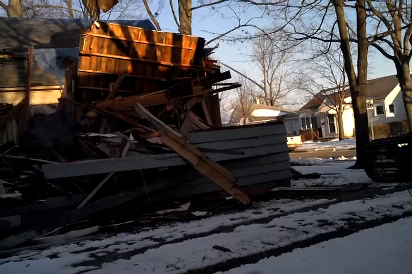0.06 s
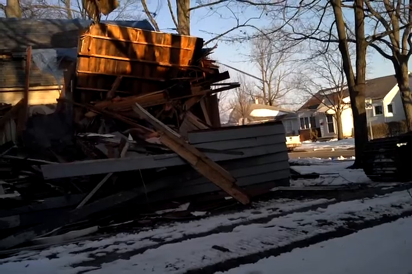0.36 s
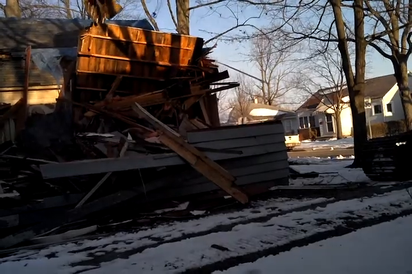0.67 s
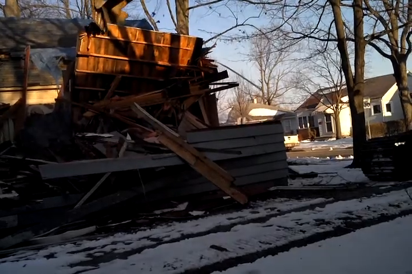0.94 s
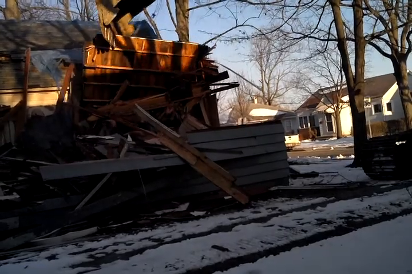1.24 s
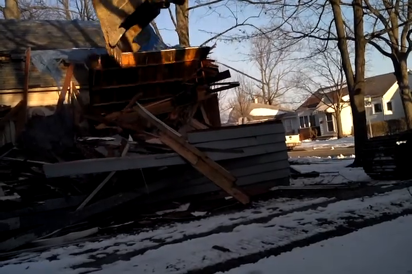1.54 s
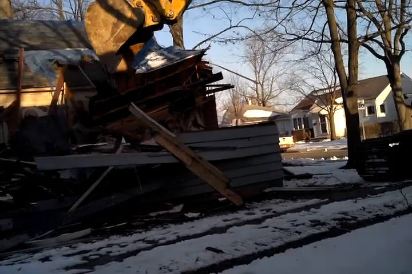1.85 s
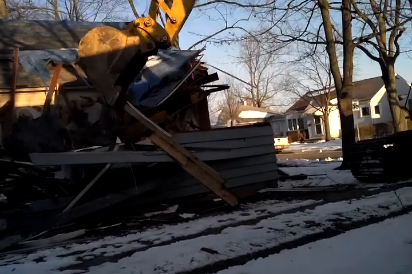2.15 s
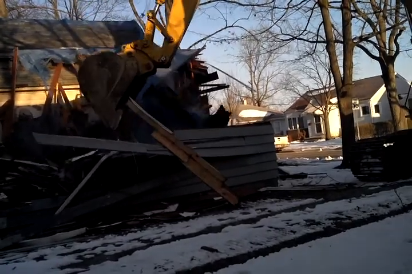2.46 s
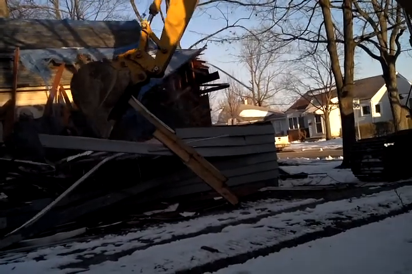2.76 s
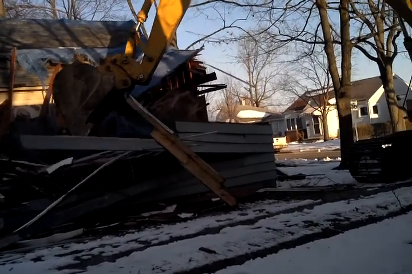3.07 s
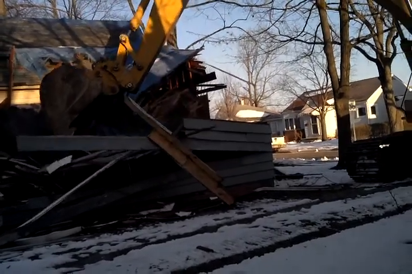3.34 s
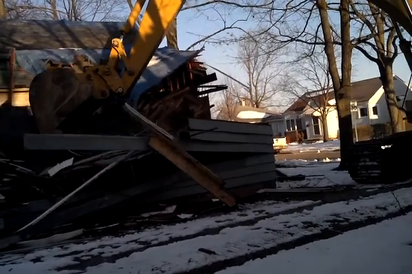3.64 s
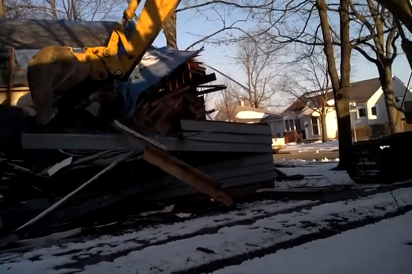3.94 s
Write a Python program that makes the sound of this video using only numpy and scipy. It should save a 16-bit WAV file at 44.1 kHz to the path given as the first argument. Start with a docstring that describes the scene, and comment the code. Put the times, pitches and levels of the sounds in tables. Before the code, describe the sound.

A wooden wall splinters under an excavator bucket, with continuous crunching, sharp cracks and hollow knocks that thin out near the end. The diesel engine labours briefly, then runs lighter. Heard across a yard, toward the right, with short echoes.

```python
"""A wooden wall splinters under the bucket of a diesel excavator, heard from across a yard.
Boards of the half-demolished house give way without pause: countless fibres snap and set the wood
ringing, with louder runs of tearing, single cracks, hollow knocks and two squeaks under the load.
Behind it the engine labours, then runs on more lightly. The small stereo microphone has the work to
its right, catches short echoes off the houses and widens its image by cross-feeding its capsules."""
import sys
import numpy as np
from scipy import signal
from scipy.fft import rfft, irfft, next_fast_len
from scipy.io import wavfile

SR = 44100
rng = np.random.default_rng(int(sys.argv[2]) if len(sys.argv) > 2 else 0)


def file_out(sig):
    """Save sig as 16-bit WAV at sys.argv[1]."""
    # one column per channel
    cols = np.atleast_2d(sig).T
    # limit, then scale
    lim = np.clip(cols, -1, 1)
    pcm = np.round(lim * 32767).astype(np.int16)
    wavfile.write(sys.argv[1], SR, pcm)


N = 176400
T = np.arange(N) / SR
FIBRES_PER_S = 5000

# steady splintering under the bucket: (time [s], level [dB], level of the finest splinters [dB])
CRUSH_LEVELS = [(0, -19.5, -32.5), (.12, -32.5, -41), (.33, -29.5, -40.5), (.6, -27.5, -37.5),
                (.69, -30, -36), (.8, -20, -32.5), (.92, -30, -39), (.97, -23.5, -30), (1.05, -23.5, -34),
                (1.11, -21, -41), (1.18, -22.5, -29.5), (1.28, -21.5, -34.5), (1.56, -24, -35),
                (1.63, -27.5, -39.5), (1.9, -27, -39), (2.05, -24, -39.5), (2.25, -24, -38.5),
                (2.38, -28.5, -41), (2.49, -22.5, -63), (2.58, -27.5, -43), (2.97, -28, -46),
                (3.02, -19, -40), (3.17, -24, -44), (3.32, -32, -46.5), (3.75, -39, -53.5), (4, -37, -49)]
# spectrum of breaking wood: (frequency [Hz], relative level [dB])
WOOD_SPECTRUM = [(50, -35), (130, -23.5), (280, -4.5), (450, 0.5), (700, 1.5), (1050, 0), (1400, -0.5),
                 (2000, 1), (3000, -7.5), (4500, -12.5), (7000, -17), (10000, -27.5), (15000, -48.5)]


def from_db(db):
    """Decibels to gain."""
    return 10 ** (np.asarray(db) / 20)


def unit_rms(x):
    """Scale each row to unit rms."""
    return x / np.sqrt(np.mean(x ** 2, axis=-1, keepdims=True) + 1e-20)


def in_time(rows):
    """The columns of a curve at every sample."""
    times, *columns = np.transpose(rows)
    return [np.interp(T, times, column) for column in columns]


def at_hz(spectrum, hz):
    """Read a spectrum in dB on a log-frequency axis."""
    points_hz, db = np.transpose(spectrum)
    return np.interp(np.log(hz + 1), np.log(points_hz), db)


def colour(x, spectrum, tilt_db=0, tilt_from_hz=1300, tilt_to_hz=13800):
    """Causal (minimum-phase) filter with the given spectrum, its treble tilted in dB per octave."""
    n = 2 * next_fast_len(x.shape[-1] // 2 + 2048)
    hz = np.fft.rfftfreq(n, 1 / SR)
    octaves = np.log2(np.clip(hz, tilt_from_hz, tilt_to_hz) / tilt_from_hz)
    cepstrum = irfft(np.log(from_db(at_hz(spectrum, hz) + tilt_db * octaves)))
    cepstrum[1:n // 2] *= 2
    cepstrum[n // 2 + 1:] = 0
    return irfft(rfft(x, n) * np.exp(rfft(cepstrum)))[..., :x.shape[-1]]


def drift(per_s):
    """Random wander of unit rms that changes per_s times a second."""
    return unit_rms(np.interp(T * per_s, np.arange(4096), rng.standard_normal(4096)))


def swell(t, rise_s, fall_s):
    """Bell-shaped rise to 1 at t = 0, then exponential fall."""
    return np.exp(-(np.minimum(t, 0) / max(rise_s, 1e-4)) ** 2 - np.maximum(t, 0) / fall_s)


def yard_echoes(x, level_db=-9, t60_s=0.19, cut_hz=8000):
    """The wreck and the neighbouring houses throw back a thin, dull tail of echoes."""
    t = T[:SR]
    reflections = rng.standard_normal((2, SR)) * (rng.random((2, SR)) < .03)
    tail = reflections * np.exp(-np.log(1000) * t / t60_s) * (t > .006)
    tail = from_db(level_db) * unit_rms(tail) / np.sqrt(SR)
    dull = signal.sosfilt(signal.butter(1, cut_hz, fs=SR, output="sos"), x)
    return signal.fftconvolve(dull, tail, axes=-1)[:, :N]


def engine(firings_per_turn=3, throb_depth=0.098, waver_db=2.0):
    """The diesel: crankshaft tones over noise that throbs with the firing, more rumble under load."""
    # crankshaft speed: (time [s], speed [turns/s])
    speed_curve = [(0, 24.5), (.47, 24.3), (.62, 22.9), (1.2, 25), (2.1, 23.2), (3.2, 21.5), (3.58, 21.1),
                   (4, 25.4)]
    # how hard the engine labours: (time [s], load [0-1])
    load_curve = [(0, 1), (.47, 1), (.53, 0.06), (4, 0.22)]
    # engine tones: (multiple of the speed, level running freely [dB], level labouring [dB])
    orders = [(4, -46, -38), (5, -51.5, -38), (6, -49.5, -41), (7, -42, -29), (8, -50.5, -34.5),
              (14, -48, -37)]
    # engine and fan noise: (frequency [Hz], density [dB per Hz])
    machine_spectrum = [(50, -82), (90, -78.5), (130, -62), (200, -57), (330, -56.5), (480, -60.5),
                        (670, -55), (810, -64.5), (1000, -54), (1400, -71.5), (2000, -69), (3000, -73.5),
                        (4500, -78), (7000, -89.5), (10000, -104), (15000, -108)]
    # exhaust noise at full load: (frequency [Hz], density [dB per Hz])
    exhaust_spectrum = [(30, -92), (60, -80), (100, -52), (200, -52), (320, -51), (520, -61.5),
                        (660, -53.5), (1050, -57), (1400, -64), (3000, -103)]
    (speed,), (load,) = in_time(speed_curve), in_time(load_curve)
    crank_angle = 2 * np.pi * np.cumsum(speed) / SR
    tones = 0
    for order, free_db, labouring_db in orders:
        level_db = free_db + (labouring_db - free_db) * load + waver_db * drift(11)
        phase = order * crank_angle + rng.uniform(0, 2 * np.pi) + 0.47 * drift(14)
        tones += np.sqrt(2) * from_db(level_db) * np.sin(phase)
    white = rng.standard_normal((2, 2, N)) * np.sqrt(SR / 2)
    noise = colour(white[0], machine_spectrum) + load * colour(white[1], exhaust_spectrum)
    throb = 1 + throb_depth * np.sin(firings_per_turn * crank_angle)
    return noise * throb + tones * np.array([[1], [0]])  # the tones arrive by the direct path only


def squeaks(pitch_waver=.02):
    """Stick-slip, perhaps of a nail or the bucket on wood: short, rough tones with harmonics."""
    # (peak time [s], pitch [Hz], glide [octaves/s], rise [s], fall [s], levels of harmonics 1-4 [dB])
    slips = [(0.496, 1784, 0, 0.0042, 0.023, -18.5, -18, -22, -28),
             (3.508, 1084, -22, 0.0039, 0.0062, -12, -30, -21.5, -26)]
    out = np.zeros((2, N))
    for s, hz, glide, rise_s, fall_s, *levels_db in slips:
        pitch = hz * 2 ** (glide * np.clip(T - s, -2 * rise_s, fall_s))
        phase = 2 * np.pi * np.cumsum(pitch * (1 + pitch_waver * drift(700))) / SR
        tone = sum(from_db(db + 2 * drift(400)) * np.exp(1j * k * phase)
                   for k, db in enumerate(levels_db, 1))
        tone = np.sqrt(2) * tone * swell(T - s, rise_s, fall_s)
        out += [tone.real, tone.imag]
    return out


def clatter(per_s=45, lowest_hz=640, octaves=2, decay_cycles=5):
    """Loose boards knock at random, as hard as the bucket is crushing: a list of strikes for knocks."""
    crush_db, _ = in_time(CRUSH_LEVELS)
    strikes = []
    for when, place, weakness in rng.random((int(per_s * N / SR), 3)):
        hz = lowest_hz * 2 ** (octaves * place)
        level_db = crush_db[int(when * N)] + 2 - 10 * weakness
        strikes.append((when * N / SR, hz, level_db, decay_cycles / hz))
    return strikes


def knocks(loose_strikes):
    """Struck boards, large ones and loose ones, ring hollow in a few quickly dying modes."""
    # knocks of larger boards: (time [s], pitch [Hz], level [dB], decay [s])
    large_strikes = [(.508, 1048, -16.5, 0.02), (.866, 648, -25.5, 0.01), (1.012, 489, -16, .006),
                     (1.088, 1125, -15, 0.011), (1.572, 1066, -11, 0.0055), (1.72, 683, -23, 0.011),
                     (2.12, 698, -17.5, 0.02), (2.421, 682.4, -18, 0.0059), (2.995, 646, -14.5, 0.0078),
                     (3.178, 937, -20, 0.017)]
    # modes of a board: (multiple of its pitch, relative level [dB])
    modes = [(0.999, 5.5), (1.329, -1.5), (1.62, -6)]
    out = np.zeros((2, N))
    for s, hz, level_db, decay_s in large_strikes + loose_strikes:
        start = int(s * SR)
        t = T[:min(SR // 3, N - start)]
        for ratio, mode_db in modes:
            paths = np.array([[1], [rng.uniform(-0.75, 1)]])  # direct, scattered
            ring = np.sin(2 * np.pi * hz * ratio * t) * np.exp(-t / decay_s)
            out[:, start:start + len(t)] += from_db(level_db + mode_db) * ring * paths
    return out


def snaps(decay_s=.0022):
    """A brittle piece parts at once: a very short spit of noise, an octave wide."""
    # brittle pieces parting: (time [s], level [dB], band centre [Hz])
    pieces = [(1.149, -19, 9500), (1.164, -19.5, 8500), (1.190, -23, 10500), (3.4972, -11, 3200),
              (3.5095, -15, 3300)]
    out, t = np.zeros((2, N)), T[:SR // 20]
    for s, level_db, hz in pieces:
        band = signal.butter(1, [hz / np.sqrt(2), hz * np.sqrt(2)], "band", fs=SR, output="sos")
        spit = unit_rms(signal.sosfilt(band, rng.standard_normal((2, len(t)))))
        start = int(s * SR)
        out[:, start:start + len(t)] += from_db(level_db) * spit * np.exp(-t / decay_s)
    return out


def clicks(per_s, size, spread_db=1):
    """Fibres snap at random: two rows (direct, scattered) of clicks of uneven strength."""
    strength = from_db(spread_db * np.minimum(rng.exponential(1, (2, size)), 4))
    polarity = rng.choice([-1, 1], (2, size))
    return strength * polarity * (rng.random((2, size)) < per_s / SR)


def boards(x, count, low_hz=372, high_hz=4330, t60_cycles=45, ring_gain=0.57):
    """Deal clicks to boards that each ring briefly at a pitch of their own; the dry snap stays on top."""
    dealt, rings = rng.integers(0, count, x.shape), 0
    for k, place in enumerate((np.arange(count) + rng.random(count)) / count):
        hz = low_hz * (high_hz / low_hz) ** place
        radius = np.exp(-np.log(1000) * hz / (t60_cycles * SR))
        poles = [1, -2 * radius * np.cos(2 * np.pi * hz / SR), radius ** 2]
        ring = signal.lfilter([1 - radius, 0, radius - 1], poles, x * (dealt == k) + 1e-18)
        rings += ring * (-1) ** k
    return x + ring_gain * np.sqrt(count) * rings


def crushing(splinters_per_s=1500, flutter_rms_db=1.58):
    """Countless splinters, coarse and fine, give way while the bucket presses down."""
    # spectrum of the finest splinters: (frequency [Hz], relative level [dB])
    fine_spectrum = [(1000, -23), (3500, 6.5), (8500, 2), (11000, -9.5), (15000, -18)]
    coarse_db, fine_db = in_time(CRUSH_LEVELS)
    flutter_db = flutter_rms_db * drift(110)
    coarse = unit_rms(colour(boards(clicks(splinters_per_s, N), count=24), WOOD_SPECTRUM))
    fine = unit_rms(colour(clicks(FIBRES_PER_S, N), fine_spectrum))
    return from_db(coarse_db + flutter_db) * coarse + from_db(fine_db + flutter_db) * fine


def fracture(s, level_db, rise_s, fall_s, tilt_db, hold_s=0):
    """One board breaks: a burst of snapping fibres that sets a few resonances ringing."""
    size = SR // 3
    t = (np.arange(size) - size // 2) / SR
    envelope = swell(t - np.clip(t, 0, hold_s), rise_s, fall_s)
    fibres = clicks(FIBRES_PER_S, size) * envelope
    burst = unit_rms(colour(boards(fibres, count=5), WOOD_SPECTRUM, tilt_db))
    out = np.zeros((2, N + 2 * SR))  # a second to spare at each end
    start = SR + int(s * SR) - size // 2
    out[:, start:start + size] = burst * np.sqrt(np.mean(envelope ** 2)) * from_db(level_db)
    return out[:, SR:SR + N]


def breaking():
    """The wall's boards break: tears build up; cracks start at once and hold for an instant."""
    # runs of tearing: (peak time [s], level [dB], rise [s], fall [s], treble tilt [dB/octave])
    tears = [(0.204, -28.5, 0.0041, 0.013, 7), (.29, -31, 0.004, 0.012, 10),
             (0.522, -17, 0.011, 0.011, 1.5), (0.797, -23.5, 0.01, 0.021, 10.5),
             (.998, -16.5, 0.047, 0.019, -4), (1.092, -14.5, 0.0085, 0.022, 3),
             (1.29, -17.5, 0.028, 0.0063, 0), (1.524, -18.5, 0.0067, 0.028, 1),
             (2.125, -18, 0.017, 0.047, 1), (2.171, -16, 0.017, 0.0069, -5),
             (2.824, -18.5, 0.023, 0.029, -3), (2.937, -20.5, 0.01, 0.0086, -1.5),
             (3.183, -20, 0.0085, 0.018, -2), (3.847, -12, 0.015, 0.022, 0.1),
             (3.91, -24.5, 0.039, 0.042, -0.5), (3.952, -25.5, 0.02, 0.016, 2)]
    # single cracks: (time [s], level [dB], decay [s], treble tilt [dB/octave])
    cracks = [(.431, -17, 0.0055, -13), (.484, -14, 0.0085, 3), (.546, -15, 0.0019, -4),
              (.565, -14, 0.0037, -4), (.594, -16.5, 0.014, -3.5), (0.634, -17, 0.0048, -2),
              (.79, -13.5, 0.0049, 2), (.809, -13, 0.0026, -9), (.867, -16.5, 0.0054, 1),
              (1.011, -9, 0.0031, 0), (1.057, -11, 0.0056, 0.5), (1.067, -15, 0.0031, -4),
              (1.241, -12, 0.0064, -3.5), (1.328, -12, 0.0022, -5.5), (1.437, -12.5, 0.0036, -2),
              (1.572, -10.5, 0.01, -5.5), (1.750, -19, .015, -2), (2.866, -17, 0.0068, -2),
              (2.908, -23, 0.0091, 2), (2.997, -22.5, 0.006, 1), (3.5, -16.5, 0.014, -0.5),
              (3.816, -16.5, 0.017, 1), (3.852, -12, 0.0018, 0.5)]
    tearing = sum(fracture(*tear) for tear in tears)
    cracking = sum(fracture(s, db, 0, decay, tilt, hold_s=0.0025) for s, db, decay, tilt in cracks)
    return tearing + cracking


def scene(lean_right=0.59):
    """Direct and scattered sound cross the yard to two capsules; the right one gets more."""
    # stereo width, as gain on the side signal: (frequency [Hz], gain [dB])
    width = [(100, -0.5), (230, -7), (500, -10), (900, -5.5), (2000, 2.5), (5000, 1), (14000, -1)]
    wood = crushing() + breaking() + snaps() + knocks(clatter()) + squeaks()
    direct, scattered = engine() + wood + yard_echoes(wood)
    side = np.sqrt(1 - lean_right ** 2) * scattered - lean_right * direct
    side = irfft(rfft(side) * from_db(at_hz(width, np.fft.rfftfreq(N, 1 / SR))), N)
    return np.array([direct + side, direct - side])


def record(dry, crossfeed_delay_s=.000382, crossfeed_from_hz=586, low_cut_hz=75, top_cut_hz=15800):
    """Small stereo microphone: each channel subtracts a delayed copy of the other above the bass."""
    # microphone response: (frequency [Hz], gain [dB])
    response = [(450, -1), (1000, -5), (2000, -5.5), (14000, -4)]
    hz = np.fft.rfftfreq(2 * N, 1 / SR)
    above_bass = 1 - np.exp(-(hz / crossfeed_from_hz) ** 2)
    crossfeed = above_bass * np.exp(-2j * np.pi * hz * crossfeed_delay_s)
    capsules = rfft(dry, 2 * N)
    wide = irfft((capsules - crossfeed * capsules[::-1]) * from_db(at_hz(response, hz)))[:, :N]
    low_cut = signal.butter(4, low_cut_hz, "high", fs=SR, output="sos")
    top_cut = signal.ellip(10, .2, 80, top_cut_hz, fs=SR, output="sos")
    clipped = np.clip(signal.sosfilt(low_cut, wide), -1, 1)  # overload
    return signal.sosfilt(top_cut, clipped)


dry = scene()
out = record(dry)
file_out(out)
```